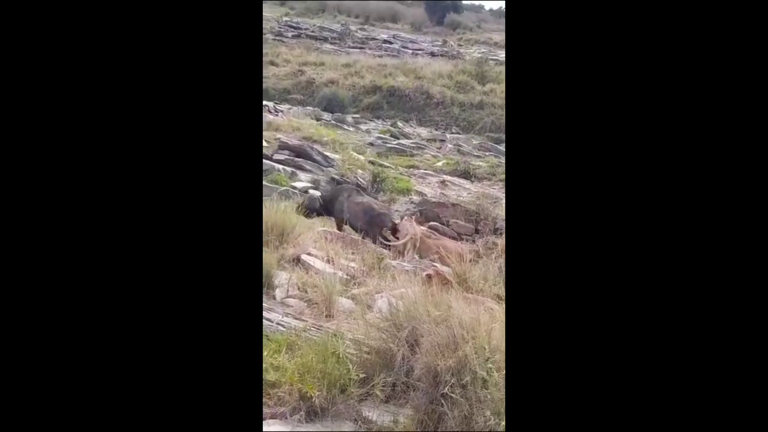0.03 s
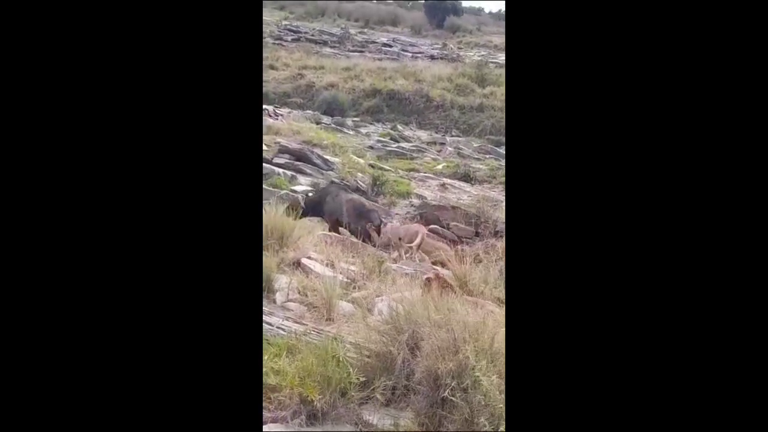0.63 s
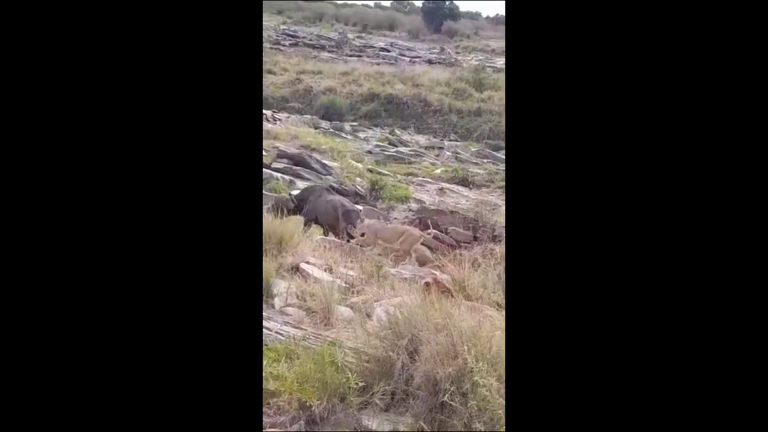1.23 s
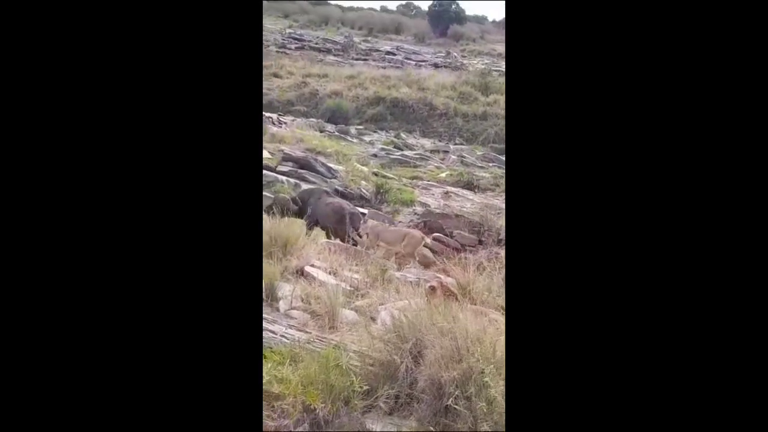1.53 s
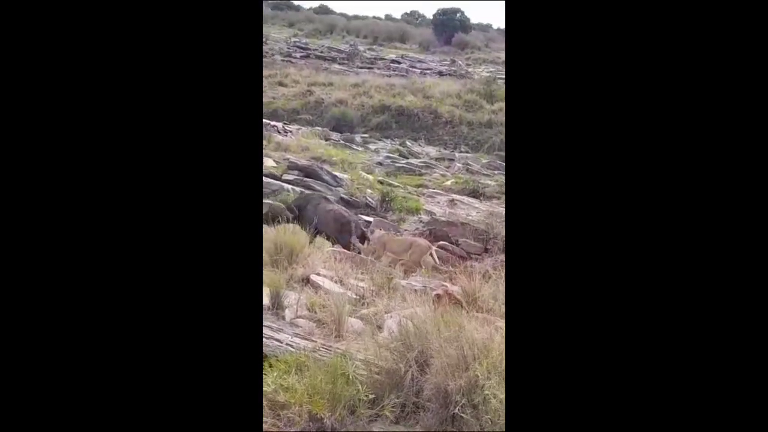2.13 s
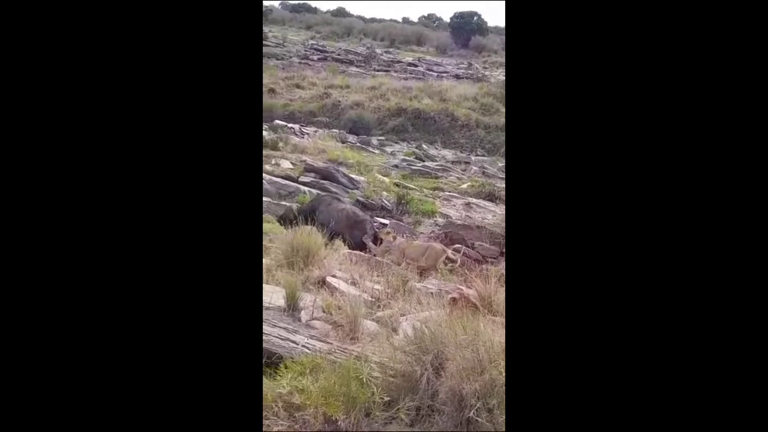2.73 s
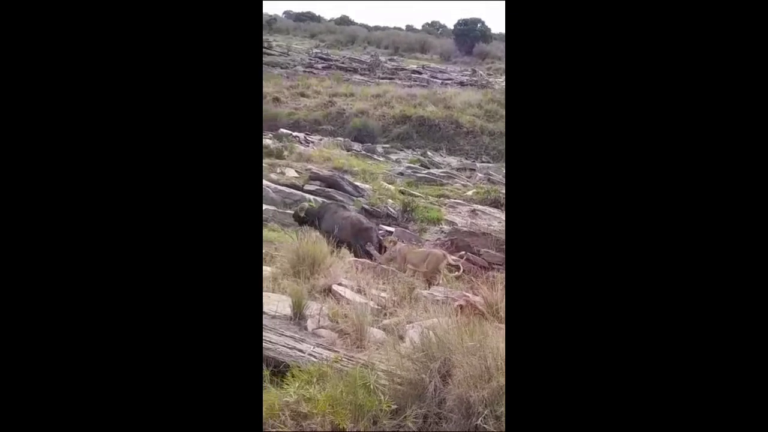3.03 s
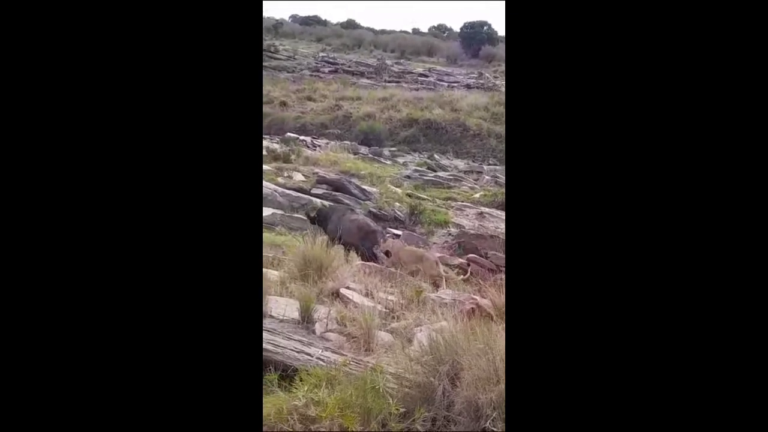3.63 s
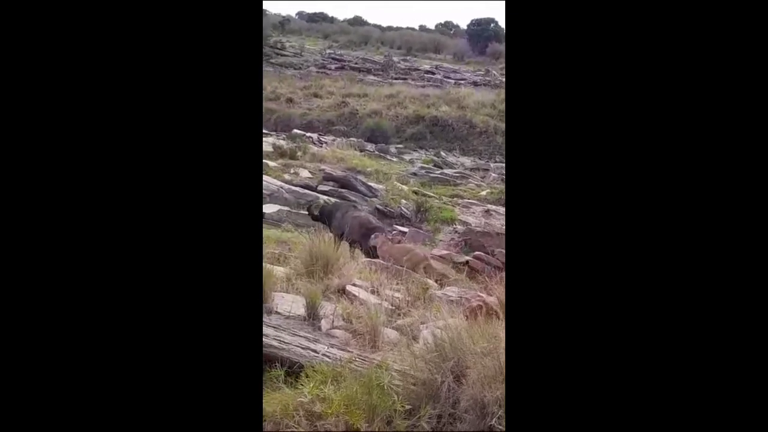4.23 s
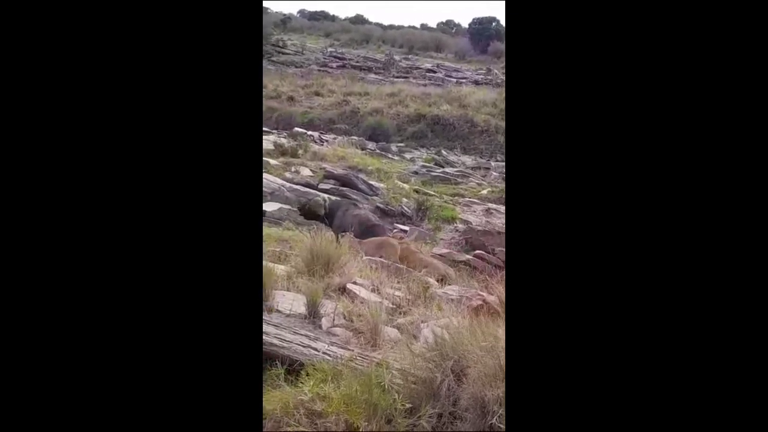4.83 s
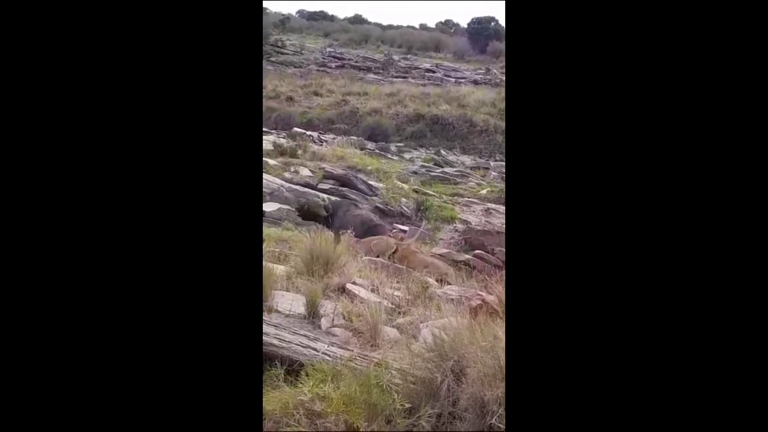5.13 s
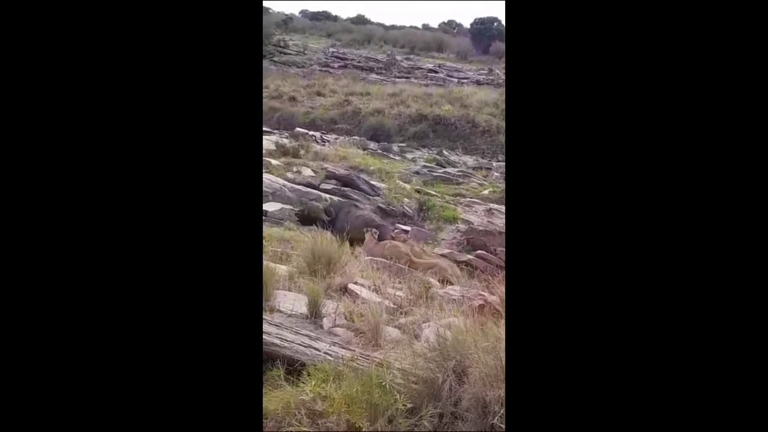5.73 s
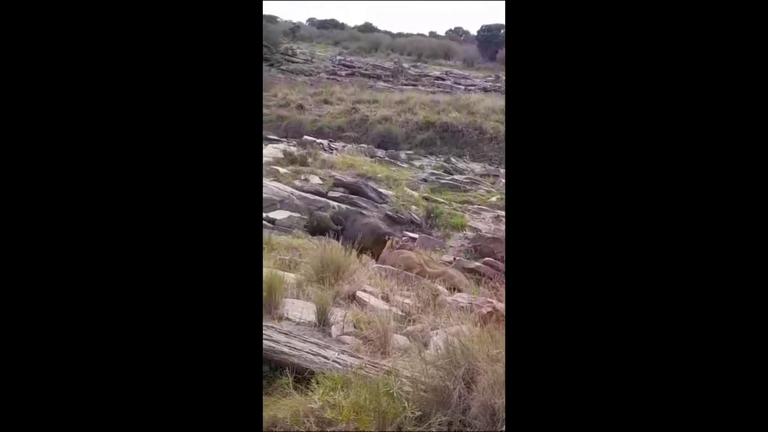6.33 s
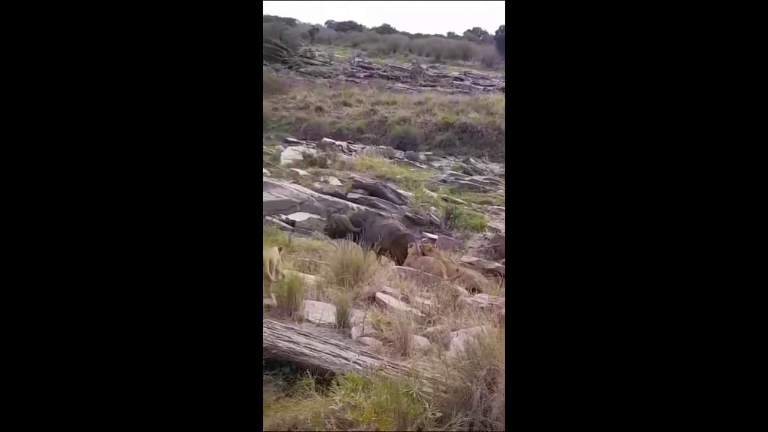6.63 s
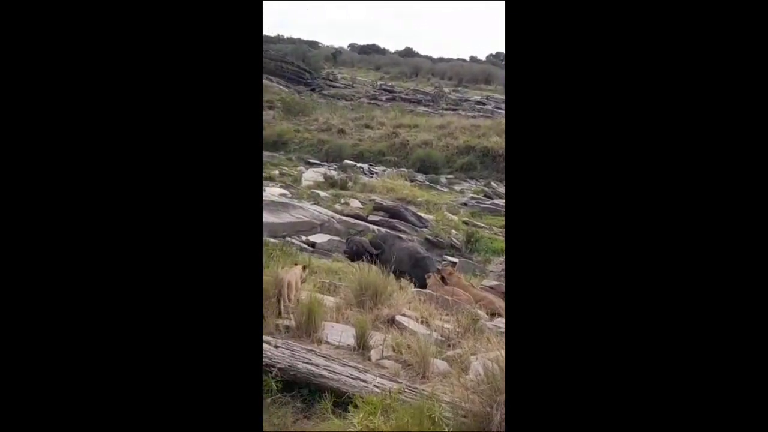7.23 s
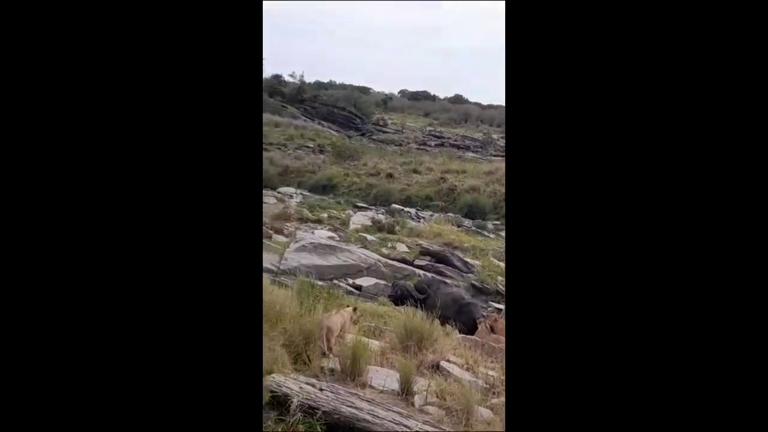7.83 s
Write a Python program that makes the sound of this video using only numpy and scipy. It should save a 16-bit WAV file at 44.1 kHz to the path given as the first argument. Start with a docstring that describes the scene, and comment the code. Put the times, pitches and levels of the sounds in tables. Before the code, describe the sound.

Outdoors on a windy savanna, uneven gusts buffet the microphone while dry grass swishes quietly close by. After a faint low growl and a soft hoot from a distant bird, a buffalo lets out a single deep, rough bellow lasting about three seconds. The call holds, opens into a loud climax and drops away. The bird hoots faintly once more as the wind keeps rumbling.

```python
"""A buffalo gives one long, rattling bellow across open savanna, a while after a faint low growl.
Each slap of its vocal folds rings the throat; the slow pulses limp in pairs in mid-call, then the
mouth opens wide and the pitch sinks away. Gusts buffet the two microphone ports, dry grass hisses in
swells, a far bird hoots twice, and rock ledges throw back a thin echo."""
import sys
import numpy as np
from scipy import signal
from scipy.fft import rfft, irfft, next_fast_len
from scipy.io import wavfile
from scipy.ndimage import uniform_filter1d

SR = 44100
rng = np.random.default_rng(int(sys.argv[2]) if len(sys.argv) > 2 else 0)


def store_wav(level_fs):
    """Save 16-bit WAV to argv[1]."""
    pcm = np.round(np.clip(np.atleast_2d(level_fs), -1, 1) * 32767)
    wavfile.write(sys.argv[1], SR, pcm.T.astype(np.int16))


N = 347949
FFT_SIZE = next_fast_len(N, real=True)
TIME, BINS = np.arange(N) / SR, np.fft.rfftfreq(FFT_SIZE, 1 / SR)
CONTROL_TIME = np.linspace(0, N / SR, 4000)  # coarse grid for slow envelopes

# single hard hits of wind: start_s, thump_db, crackle_db
BUFFETS = [(0.372, -26, -46.5), (0.405, -21.5, -49), (0.447, -14.5, -48.5), (0.51, -21, -56),
           (0.533, -32, -42), (0.608, -27, -40), (0.632, -17.5, -42.5), (0.659, -17.5, -46),
           (0.732, -20, -64), (0.752, -18.5, -71), (1.185, -25.5, -56), (1.22, -22, -53),
           (1.273, -27.5, -50), (1.484, -20.5, -74), (1.593, -8.5, -68), (1.643, -20, -38.5),
           (1.674, -7.5, -51), (1.701, -11.5, -70), (1.728, -23, -72), (1.763, -10, -47.5),
           (1.839, -15.5, -62), (1.952, -14.5, -76), (2.156, -23, -49), (2.383, -15, -66),
           (2.688, -25.5, -46.5), (2.969, -14, -54), (3.102, -15, -49), (3.155, -23, -51),
           (3.297, -14, -42), (3.364, -15.5, -40), (5.367, -16.5, -30.5), (5.854, -18.5, -45),
           (6.333, -31, -68), (6.554, -26.5, -47), (6.598, -21.5, -43.5), (6.69, -23.5, -59),
           (6.817, -29, -47), (6.88, -19.5, -60), (7.014, -21, -61), (7.391, -15, -67), (7.421, -21, -68),
           (7.479, -24, -72), (7.699, -32, -44.5)]
# tone of the wind's rumble: freq_hz, level_db
RUMBLE_EQ = [(30, -43), (70, -17), (130, -3.5), (230, -5), (330, -1), (480, -8), (700, -18), (1000, -29),
             (1500, -83), (3000, -73), (8000, -93)]
# pulse rate of the vocal folds through the bellow: time_s, pitch_hz
BELLOW_PITCH = [(2.76, 50.4), (3.02, 66.9), (3.25, 68.4), (3.5, 69.4), (3.8, 73.8), (4.1, 76.9),
                (4.35, 76.9), (4.55, 74), (4.74, 72.6), (4.92, 74.1), (5.13, 78.4), (5.42, 79.7),
                (5.51, 78.4), (5.71, 73), (5.8, 67.4), (5.9, 58), (6.02, 44.5)]


def amp(db):
    """Decibels to gain."""
    return 10 ** (np.asarray(db) / 20)


def unit(x):
    """Scales to rms 1."""
    return x / np.sqrt(np.mean(x ** 2) + 1e-20)


def unit_energy(rows):
    """Scales each row to energy 1."""
    return rows / np.linalg.norm(rows, axis=1, keepdims=True)


def follow(curve, t):
    """Value of a breakpoint curve at the times t."""
    return np.interp(t, *np.transpose(curve))


def eq_gain(eq, f):
    """Gain of a (freq_hz, level_db) curve at the frequencies f."""
    hz, db = np.transpose(eq)
    return amp(np.interp(np.log(f + 1), np.log(hz), db))


def colour(x, eq):
    """Filters by a (freq_hz, level_db) curve."""
    return irfft(rfft(x, FFT_SIZE) * eq_gain(eq, BINS), FFT_SIZE)[..., :N]


def wander(rate_hz, channels=2):
    """Smooth random motion of rms 1, rolled off above the rate."""
    spectrum = rfft(rng.standard_normal((channels, FFT_SIZE))) / (1 + (BINS / rate_hz) ** 4)
    return unit(irfft(spectrum, FFT_SIZE)[:, :N])


def add(mix, start_s, sound):
    """Mixes a sound in at its start time."""
    part = mix[..., max(round(start_s * SR), 0):][..., :sound.shape[-1]]
    part += sound[..., :part.shape[-1]]


def peak(f, hz, width):
    """Gain of a resonance with steep skirts."""
    return 1 / (1 + ((f - hz) / width * 2.04) ** 2)


def bursts(decay_s, count, size):
    """Spectra of dying puffs of noise, each of energy 1."""
    puffs = rng.standard_normal((count, size)) * np.exp(-np.arange(size) / SR / decay_s)
    return rfft(unit_energy(puffs))


def causal(gain):
    """Gives a gain curve the phase of a passive resonator: sharp start, ringing after."""
    log_gain = np.log(gain + 1e-5)
    mirrored = np.concatenate([log_gain, log_gain[..., -2:0:-1]], -1)
    return np.exp(np.conj(signal.hilbert(mirrored)))[..., :gain.shape[-1]]


def swell(t, at, length):
    """A bell-shaped bump of height 1; at the ends of its length it is down to a quarter."""
    return .5 ** (2 * (2 * (t - at) / length) ** 2)


def swells(rows, floor_db):
    """Gain of a steady floor plus (peak_s, length_s, level_db) swells, added in power."""
    power = sum((amp(db) * swell(CONTROL_TIME, at, length)) ** 2 for at, length, db in rows)
    return np.interp(TIME, CONTROL_TIME, np.sqrt(amp(floor_db) ** 2 + power))


def lulls(rows):
    """Gain that dips for each (centre_s, length_s, depth_db) lull."""
    dip_db = sum(db * swell(CONTROL_TIME, at, length) for at, length, db in rows)
    return np.interp(TIME, CONTROL_TIME, amp(dip_db))


def pan(left_db):
    """Left and right gains at constant power, the left louder by left_db."""
    return np.sqrt(2 / (1 + amp([-left_db, left_db]) ** 2))


def gusts(breeze_db=-47.5):
    """Strength and pan of gusts over a light breeze; the strongest of the moment sets the side."""
    # gusts on the microphone: peak_s, length_s, level_db, bass_left_over_right_db
    blows = [(0.008, 0.29, -36, -3), (0.266, 0.082, -42.5, 17), (0.456, 0.41, -36, 19.5),
             (0.664, 0.27, -34, 21), (1.243, 0.39, -40.5, 23), (1.708, 0.42, -26.5, 4),
             (1.954, 0.36, -33.5, -2.5), (2.176, 0.14, -34, -11.5), (2.382, 0.2, -33, -3.5),
             (2.72, 0.47, -45, 4), (2.985, 0.28, -35, 6.5), (3.082, 0.29, -29.5, 1),
             (3.332, 0.15, -28.5, -3.5), (3.606, 0.81, -40.5, 15), (4.74, 0.19, -45, 5),
             (5.08, 0.4, -39, 2), (5.344, 0.22, -38, 0), (5.605, 0.42, -36, 20), (5.853, 0.31, -39, 8),
             (6.203, 1, -59.5, 29), (6.577, 0.26, -43, 3), (6.86, 0.68, -41.5, -21.5),
             (7.025, 0.081, -41.5, -14), (7.215, 0.06, -37.5, -33), (7.422, 0.29, -35.5, -16)]
    # brief drops in the wind: centre_s, length_s, depth_db
    drops = [(0.59, 0.046, -4), (1.012, 0.037, -9), (1.352, 0.042, -7), (2.525, 0.026, -5),
             (3.028, 0.042, -17), (3.234, 0.036, -6), (3.872, 0.038, -14), (4.574, 0.12, -14),
             (6.063, 0.071, -5), (7.856, 0.53, -4.5)]
    power = np.array([(amp(db) * swell(CONTROL_TIME, at, length)) ** 2 for at, length, db, _ in blows])
    left_db = np.array(blows)[:, -1] @ power / power.sum(0)
    strength = swells([row[:3] for row in blows], floor_db=breeze_db) * lulls(drops)
    return strength, np.interp(TIME, CONTROL_TIME, left_db)


def wind(trim_db=-1, knee_db=-38, sway_db=-9, crackle_db=-24, snap_trim_db=1, snap_s=0.012,
         bass_top_hz=260):
    """Eddies strike each port on their own; soft air mostly sways, hard blows thump and crackle."""
    # tone of the air's deep sway: freq_hz, level_db
    sway_eq = [(20, -8), (60, 9), (110, 10.5), (220, -12.5), (500, -59)]
    # tone of the crackle: freq_hz, level_db
    crackle_eq = [(150, -20), (500, 0), (900, -3), (1700, -13), (2600, -26), (5500, -35), (12000, -55)]
    strength, left_db = gusts()
    gust = amp(trim_db) * strength
    hardness = (gust / amp(knee_db)) ** 0.32
    eddies = gust * unit(amp(3 * wander(rate_hz=40)))
    tearing = amp(crackle_db) * eddies * hardness * unit(amp(5 * wander(rate_hz=130)))
    snap = np.exp(-np.arange(SR // 10) / SR / snap_s)
    for start_s, _, snap_db in BUFFETS:
        add(tearing, start_s, amp(snap_db + snap_trim_db) * snap)
    sway = turbulence(amp(sway_db) * eddies / hardness, sway_eq)
    rumble = turbulence(eddies, RUMBLE_EQ)
    crackle = turbulence(tearing, crackle_eq)
    rumble += thumps()
    bass = irfft(rfft(rumble, FFT_SIZE) / (1 + (BINS / bass_top_hz) ** 8), FFT_SIZE)[:, :N]
    # the bass leans to one side, the upper rumble and the crackle to the other
    return ((sway + bass) * pan(left_db)
            + (rumble - bass) * pan(-0.7 * left_db)
            + crackle * pan(1.5 - left_db))


def turbulence(force, eq):
    """Coloured noise at each port that rides the force of the air and takes its rms."""
    noise = colour(force * rng.standard_normal((2, N)), eq)
    return np.sqrt(np.mean(force ** 2)) * unit(noise)


def port_noise(eq, shared, flutter_db, flutter_hz):
    """Fluttering noise of rms 1, partly common to both ports."""
    common, *own = rng.standard_normal((3, N))
    noise = np.sqrt(shared) * common + np.sqrt(1 - shared) * np.array(own)
    return unit(colour(noise, eq) * amp(flutter_db * wander(flutter_hz, channels=1)))


def grass(swell_trim_db=1):
    """Dry stems close by swell with a bright hiss and a softer swish."""
    # swells in the grass: peak_s, length_s, hiss_db, swish_db
    waves = [(0.22, 0.25, -68, -81), (0.517, 0.54, -63.5, -63), (0.906, 0.26, -66, -77),
             (1.048, 0.13, -66, -69), (1.192, 0.34, -72, -68.5), (1.737, 0.94, -77, -67),
             (2.254, 0.82, -69, -64), (2.642, 0.3, -74, -71), (3.697, 0.64, -86, -71),
             (4.066, 0.26, -69.5, -67.5), (4.353, 0.95, -77, -71.5), (5.094, 0.13, -63.5, -60),
             (5.423, 0.63, -64.5, -65), (5.741, 0.36, -74, -74), (6.49, 0.27, -76, -68.5),
             (6.835, 0.22, -80, -69), (7.395, 0.2, -73, -92)]
    # the grass settles for a moment: centre_s, length_s, depth_db
    rests = [(2.85, 0.2, -1.5), (4.65, 0.12, -6), (6.28, 0.19, -4.5)]
    # tone of the hiss: freq_hz, level_db
    hiss_eq = [(3000, -51), (7600, -25), (8600, -3), (9300, 5.5), (10100, 7.5), (11000, 3), (12200, 0),
               (14400, -7.5)]
    # tone of the swish: freq_hz, level_db
    swish_eq = [(1500, 6.5), (2800, 8), (3700, -0.5), (5000, 7), (6800, 5), (8500, -4), (11000, -1.5)]
    at, length, hiss_db, swish_db = np.transpose(waves)
    hiss = swells(zip(at, length, hiss_db + swell_trim_db), floor_db=-75)
    hiss = hiss * port_noise(hiss_eq, shared=0.2, flutter_db=1.04, flutter_hz=60)
    swish = swells(zip(at, length, swish_db + swell_trim_db), floor_db=-76)
    swish = swish * port_noise(swish_eq, shared=0.022, flutter_db=0.3, flutter_hz=45)
    return (hiss + swish) * lulls(rests)


def background_wash():
    """A soft mid-range wash that swells with the bellow and lingers after it."""
    # tone of the wash: freq_hz, level_db
    wash_eq = [(100, -23), (400, 23), (1000, 3.5), (1500, 10), (2100, -4.5), (2800, -13.5), (3600, -15.5),
               (6000, -23)]
    # its rise and fall: time_s, level_db
    fader = [(0, -56), (.9, -68.5), (1.4, -73), (2.6, -62), (5.9, -41), (6.35, -59), (6.8, -51),
             (7.65, -52), (7.89, -59)]
    return amp(follow(fader, TIME)) * port_noise(wash_eq, shared=0.26, flutter_db=3, flutter_hz=23.7)


def growl(start_s=0.0078, end_s=.225, rate_hz=61, level_db=-49, weak_db=-16, size=4096):
    """A few slack, separate throat pulses, every second one weak."""
    # throat resonances of the growl: freq_hz, width_hz, level_db
    formants = [(794, 71, 9), (980, 110, 1), (1310, 150, -16), (1620, 200, -9)]
    f = np.fft.rfftfreq(size, 1 / SR)
    ring = irfft(causal(sum(amp(db) * peak(f, hz, width) for hz, width, db in formants)))
    ring /= abs(ring).max()
    out = np.zeros(N)
    for k, at in enumerate(np.arange(start_s, end_s, 1 / rate_hz)):
        add(out, at, amp(level_db + weak_db * (k % 2 == 0)) * ring)
    return out


def small_noises(grain_db=3):
    """Brief grainy noises: rustles, snaps, faint bands of hiss and the buffalo's short closing rasp."""
    # bands of noise: start_s, length_s, centre_hz, width_hz, level_db
    # at 1.731 s and 7.548 s a faint narrow hiss near 3 kHz; at 6.048 s the buffalo's rasp
    bands = [(0.117, 0.3, 3980, 450, -70), (0.318, 0.27, 3220, 1500, -66.5), (0.574, 0.03, 1280, 1060, -63),
             (0.693, 0.0028, 10600, 8200, -56), (1.043, 0.016, 1090, 900, -69),
             (1.731, 0.23, 3180, 700, -71), (6.048, 0.071, 1060, 595, -51), (6.527, 0.076, 930, 260, -56),
             (7.548, 0.24, 2720, 200, -74.5)]
    grain = unit(amp(grain_db * wander(rate_hz=250, channels=1)[0]))
    f = np.fft.rfftfreq(SR, 1 / SR)
    out = np.zeros(N)
    for start_s, length_s, hz, width, db in bands:
        n = round(length_s * SR)
        band = irfft(rfft(rng.standard_normal(SR)) * peak(f, hz, width))[:n]
        add(out, start_s, amp(db) * unit(band) * signal.windows.tukey(n, .6))
    return out * grain


def thumps(trim_db=-10, decay_s=0.0073, dull_hz=850, size=4096):
    """Each hard buffet gives both ports a short shove that rings a little deeper than the rumble."""
    f = np.fft.rfftfreq(size, 1 / SR)
    body = causal(eq_gain(RUMBLE_EQ, f) / (1 + (f / dull_hz) ** 2))
    out = np.zeros((2, N))
    for start_s, thump_db, _ in BUFFETS:
        shove = unit_energy(irfft(body * bursts(decay_s, count=2, size=size)))
        add(out, start_s, amp(thump_db + trim_db) * np.sqrt(decay_s * SR) * shove)
    return out


def hoots():
    """Soft, pure gliding notes of a far bird."""
    # the bird's notes: start_s, length_s, start_hz, end_hz, level_db
    notes = [(0.824, 0.138, 518, 743, -54), (6.168, 0.13, 638, 569, -50.5)]
    out = np.zeros(N)
    for start_s, length_s, start_hz, end_hz, db in notes:
        hz = np.linspace(start_hz, end_hz, round(length_s * SR))
        add(out, start_s, amp(db) * np.hanning(len(hz)) * np.sin(2 * np.pi * np.cumsum(hz) / SR))
    return out


def bellow(limp_ms=.41, unsteady_ms=.018, jitter_ms=0.47, shimmer_db=3, size=4096):
    """Each slap of the vocal folds, with its airy puff, rings the throat as it is shaped just then."""
    # push behind the call: time_s, level_db
    effort = [(2.74, -59), (2.82, -62), (2.98, -50.5), (3.12, -41), (3.65, -46.5), (4.2, -42),
              (4.62, -44.5), (4.9, -37.5), (5.15, -28.5), (5.55, -28), (5.87, -32.5), (5.915, -42.5),
              (5.955, -54.5), (5.99, -53), (6.02, -66)]
    # the folds rasp in mid-call and beat cleanly through the climax: time_s, roughness_share
    roughness = [(2.9, .3), (3.05, .1), (3.27, .1), (3.42, .3), (3.7, .3), (3.9, .17), (4.4, .24),
                 (4.65, .045), (5.8, .07)]
    t = TIME[(TIME > BELLOW_PITCH[0][0]) & (TIME < BELLOW_PITCH[-1][0])]
    cycles = np.floor(np.cumsum(follow(BELLOW_PITCH, t)) / SR)
    slap_s = t[1:][np.diff(cycles) > 0][:, None]  # one row a slap
    f = np.fft.rfftfreq(size, 1 / SR)
    rough = follow(roughness, slap_s)
    mouth = np.interp(slap_s, [4.52, 5.6, 5.63, 6.26], [0, 1, 1, 0])  # 0 narrow, 1 wide
    jitter, shimmer, flicker = rng.standard_normal((3, len(slap_s), 1))
    voice = throat(f, slap_s, mouth) * vocal_folds(f, rough, mouth, flicker, size)
    # in mid-call every second slap comes late, which puts lines halfway between the harmonics
    late_ms = np.interp(slap_s, [3.35, 3.8, 5.15, 5.22], [0, limp_ms, limp_ms, 0])
    every_second = np.arange(len(slap_s))[:, None] % 2
    delay_ms = 1 + late_ms * every_second + (unsteady_ms + jitter_ms * rough) * jitter
    pulses = irfft(voice * np.exp(-2j * np.pi * f * delay_ms / 1000))
    # steady lung pressure gives each pulse nearly the same energy before the effort shapes the call
    pulses = unit_energy(pulses) * amp(shimmer_db * rough * shimmer)
    pulses *= amp(follow(effort, slap_s)) * np.sqrt(SR / follow(BELLOW_PITCH, slap_s))
    out = np.zeros(N)
    for at, pulse in zip(slap_s[:, 0], pulses):
        add(out, at, pulse)
    return out


def throat(f, slap_s, mouth, waver_db=1.5, croak_hz=58.4):
    """The throat's response at each slap: it starts slack, tightens and slackens again."""
    # throat resonances: freq_hz, width_hz, mouth_narrow_db, mouth_wide_db, slack_shift_hz, slack_db
    formants = [(317, 132, 0, -9, -33, 1), (702, 93, 4.5, -14.5, -27, -1.5),
                (1041, 170, 8.5, 8.5, 65, -7.5), (1074, 340, -34, -5.5, 44, 10.5), (1284, 95, 8, 9, 13, 1),
                (1525, 144, -16.5, -7.5, 59, 5), (2110, 510, -19, -75, 3, -6), (2304, 55, -21, -31, 29, 6),
                (2915, 370, -21.5, -37, -30, 5), (3250, 150, -25, -32, -6, 5.5),
                (3880, 247, -20.5, -13.5, 45, -3.5), (4300, 190, -39, -34.5, 32, 17.5),
                (5000, 230, -41, -41, -430, 16), (6430, 1000, -77, -40.5, 298, 11.5),
                (9900, 1600, -42.5, -44, 0, 7)]
    # passing vowel resonances: peak_s, length_s, freq_hz, glide_hz_per_s, width_hz, level_db
    vowel_rings = [(2.815, 0.27, 1277, 0, 50.5, 19), (3.173, 0.14, 1160, 300, 89, 8.5),
                   (3.187, 0.52, 4600, 0, 480, -19.5), (4.11, 0.53, 1558, -2, 69.4, -3),
                   (4.165, 1, 3520, 2, 400, -22), (4.15, 0.97, 5000, 5, 350, -29),
                   (5.077, 1, 724, -150, 106, -4.5), (5.124, 0.37, 3300, 600, 380, -20),
                   (5.29, 0.4, 5070, -1000, 348, -23.5), (5.39, 0.16, 1313, -9, 70, 12),
                   (5.573, 0.18, 3940, 0, 195, -15), (5.69, 0.84, 4430, -300, 347, -26),
                   (5.653, 0.23, 631, -250, 60, 0.5), (5.704, 0.99, 2310, 0, 170, -21)]
    slack = np.interp(slap_s, [3.37, 3.45, 5.45, 5.82], [1, 0.37, 0.37, 1])
    damping = 1 + 0.68 * (follow(BELLOW_PITCH, slap_s) < croak_hz)  # in a croak the ring dies fast
    # each resonance wavers in strength over a few pulses
    drift = rng.standard_normal((len(formants), len(slap_s), 1))
    wavers = waver_db * unit(uniform_filter1d(drift, size=4, axis=1))
    power = 0
    for (hz, width, narrow_db, wide_db, shift_hz, slack_db), waver in zip(formants, wavers):
        db = narrow_db + mouth * (wide_db - narrow_db) + slack * slack_db + waver
        power += (amp(db) * peak(f, hz + slack * shift_hz, width * damping)) ** 2
    for at, length, hz, glide, width, db in vowel_rings:
        power += (amp(db) * swell(slap_s, at, length) * peak(f, hz + glide * (slap_s - at), width)) ** 2
    return causal(np.sqrt(power))


def vocal_folds(f, rough, mouth, flicker, size, bright_hz=3000, airy_hz=2800):
    """Each slap is a clean snap and a wet fizz, sharper as the mouth opens; rough folds leak a puff."""
    treble = f ** 2 / (f ** 2 + bright_hz ** 2)
    treble_db = -3 + 4 * mouth + 2.1 * flicker
    snap_and_fizz = .3 + .4 * bursts(decay_s=.003, count=len(rough), size=size)
    slap = (1 - treble) + amp(treble_db) * treble * snap_and_fizz
    # the leaking air is weak in the bass, so the low harmonics stay clean
    air_tilt = .6 + 3.9 * f ** 2 / (f ** 2 + airy_hz ** 2)
    puff = air_tilt * bursts(decay_s=0.049, count=len(rough), size=size)
    return (1 - rough) * slap + rough * puff


def rocks(x, t60_s=0.022, predelay_s=.008, wet_db=-18, dull_hz=3500):
    """Rock ledges scatter a thin, dull tail back to each port."""
    t = np.arange(SR // 2) / SR
    echoes = rng.standard_normal((2, len(t))) * (rng.random((2, len(t))) < .03)
    echoes *= amp(-60 * t / t60_s) * (t > predelay_s)
    tail = signal.lfilter(*signal.butter(1, dull_hz, fs=SR), echoes)
    tail = unit_energy(tail + .5 * tail[::-1])  # the ports sit close and hear much the same echoes
    return x + amp(wet_db) * signal.fftconvolve(x[None], tail, axes=1)[:, :N]


def scene():
    """Animals among the rocks, grass around, wind on the microphone."""
    return rocks(bellow() + growl() + hoots() + small_noises()) + grass() + background_wash() + wind()


def record(dry, cutoff_hz=14560):
    """Each microphone port has its own colour; a steep low-pass takes off the very top."""
    # balance of the two ports: freq_hz, left_over_right_db
    balance = [(60, 3), (150, 2), (330, -1), (1200, -4), (2300, -2), (4000, -2.5), (8000, -11.5),
               (10500, 0), (13500, 9)]
    left = colour(dry[0], [(hz, db / 2) for hz, db in balance])
    right = colour(dry[1], [(hz, -db / 2) for hz, db in balance])
    low_pass = signal.firwin(1023, cutoff_hz, window=("kaiser", 9), fs=SR)
    return signal.oaconvolve(np.array([left, right]), low_pass[None], "same")


dry = scene()
out = record(dry)
store_wav(out)
```